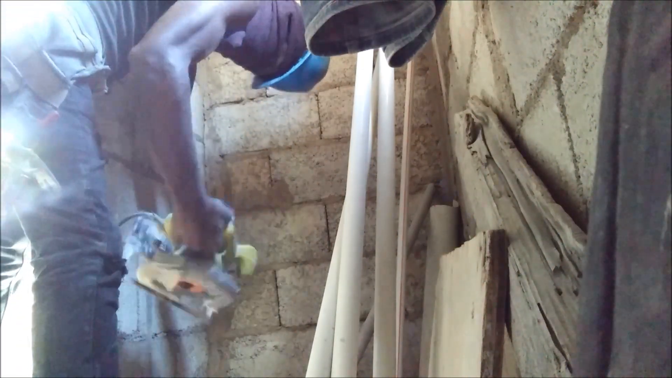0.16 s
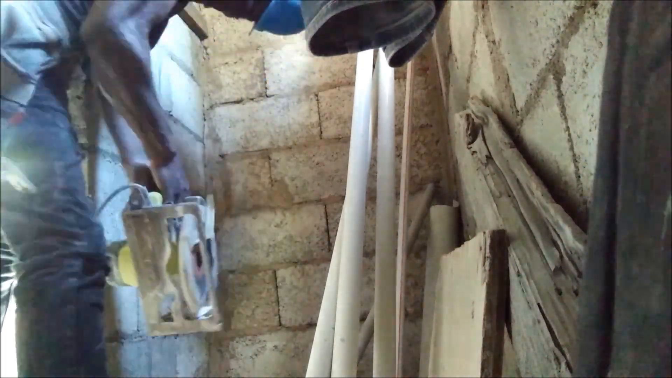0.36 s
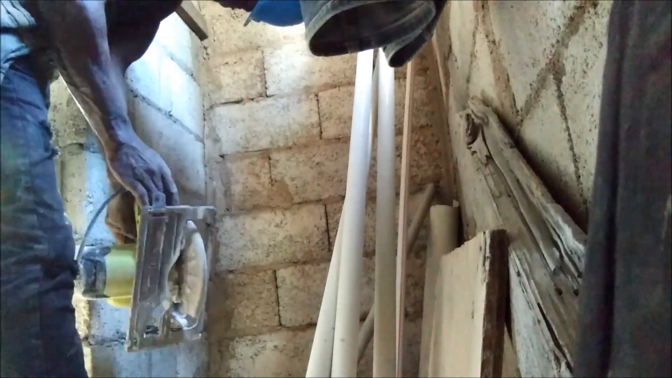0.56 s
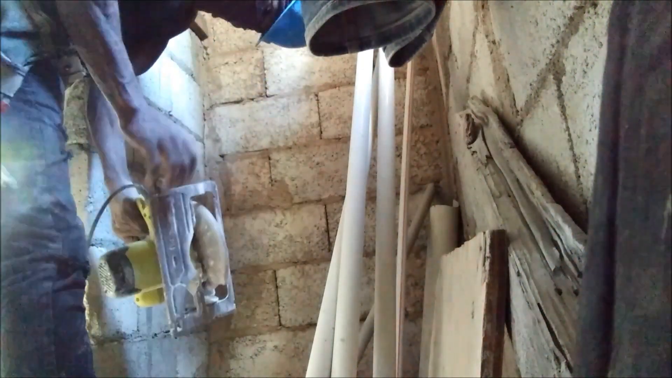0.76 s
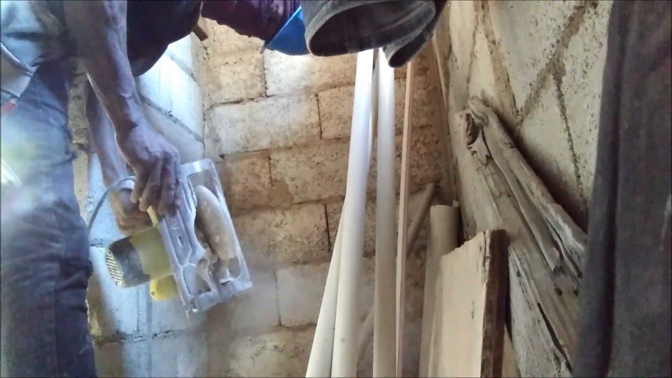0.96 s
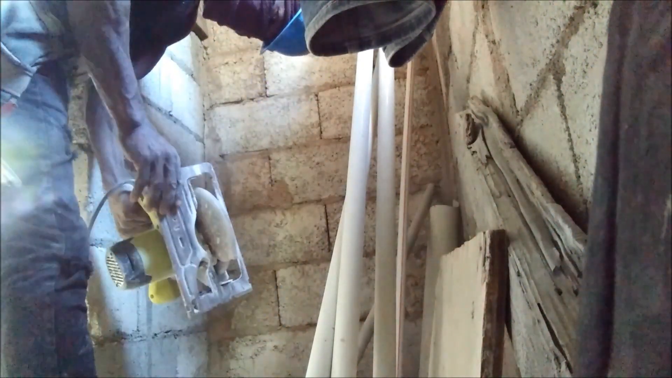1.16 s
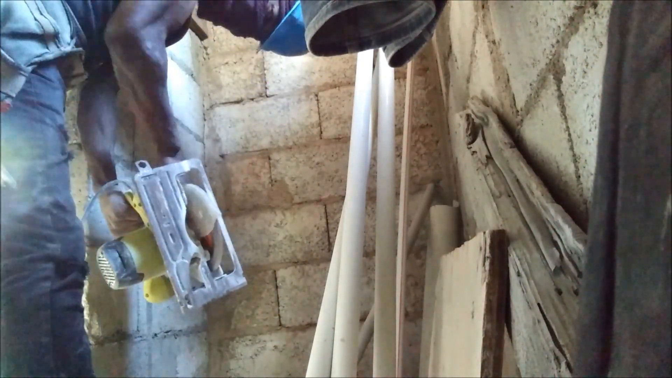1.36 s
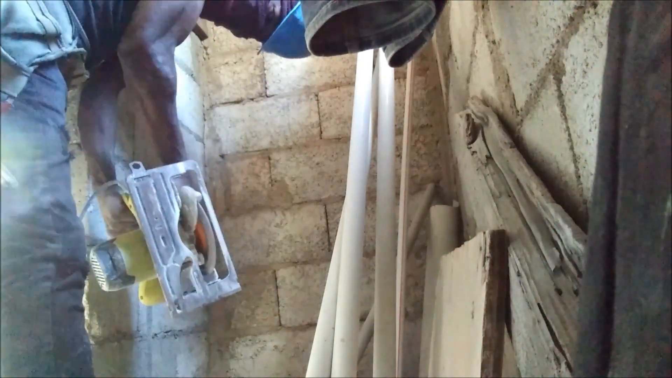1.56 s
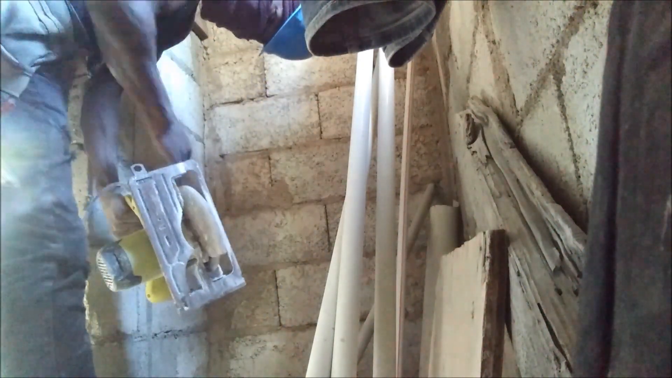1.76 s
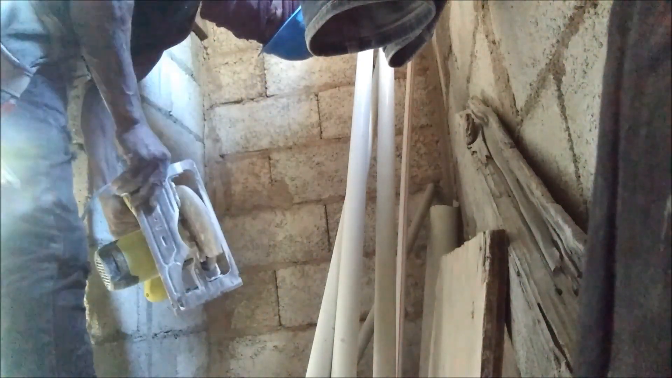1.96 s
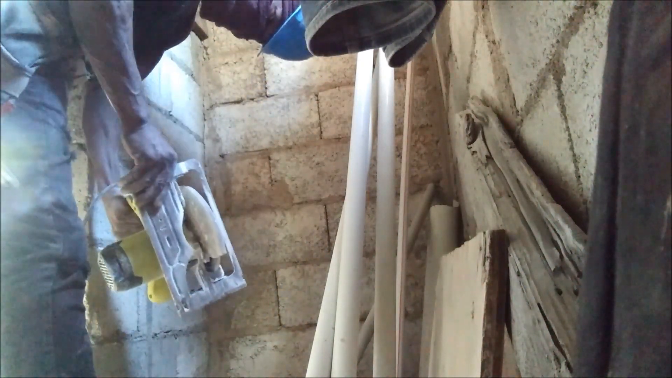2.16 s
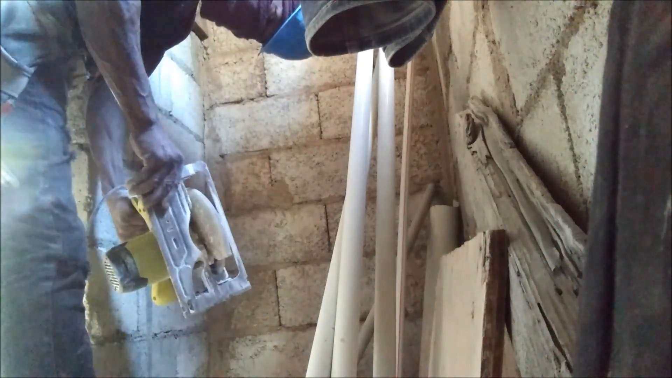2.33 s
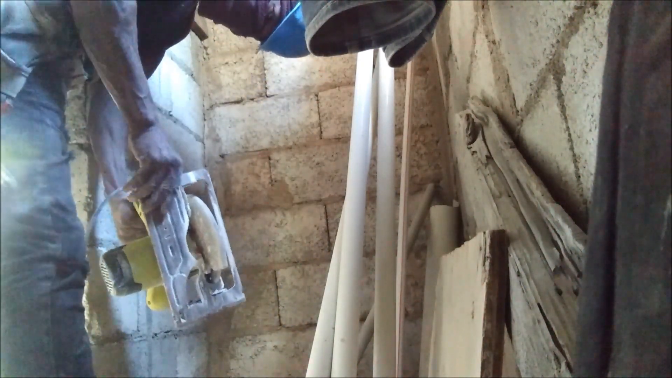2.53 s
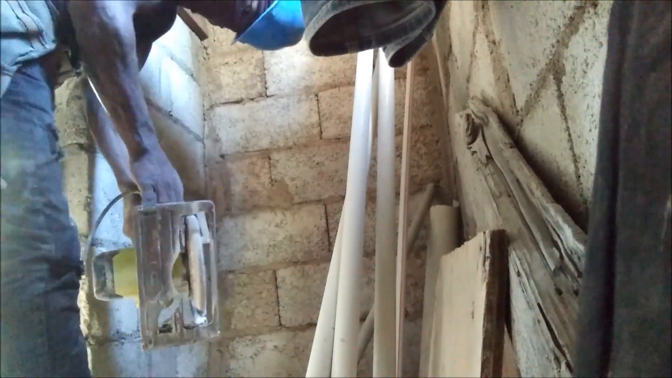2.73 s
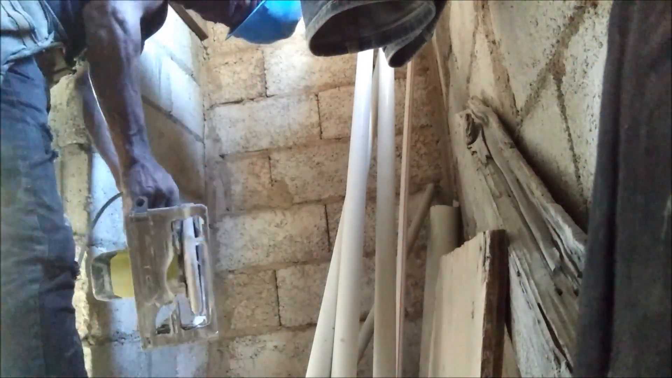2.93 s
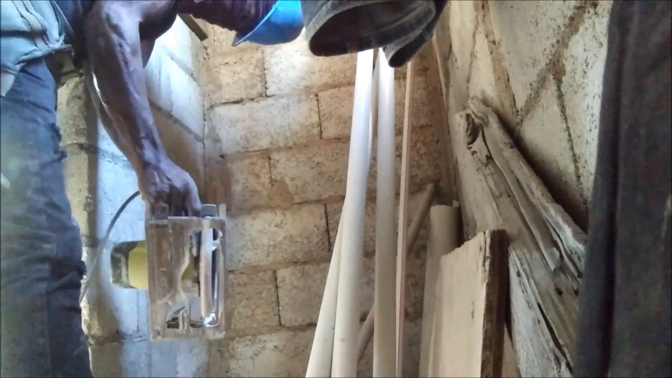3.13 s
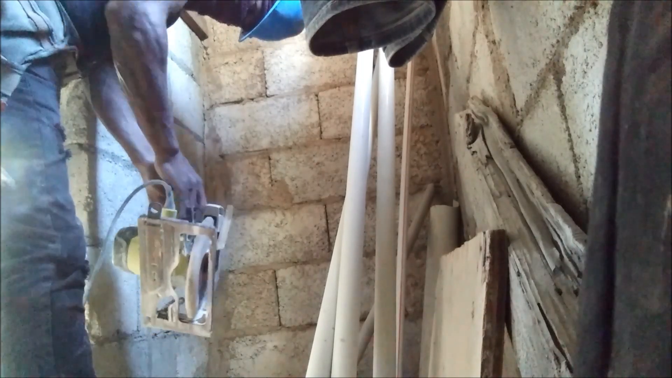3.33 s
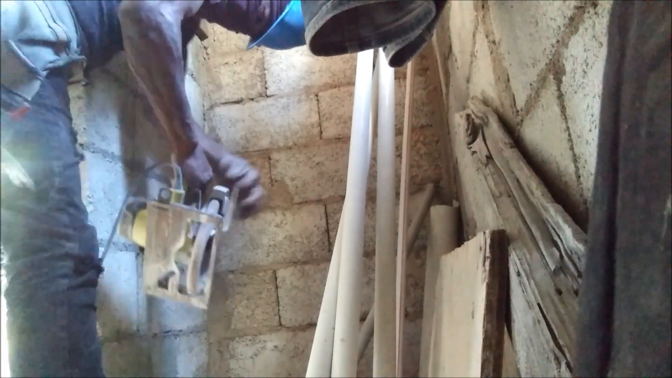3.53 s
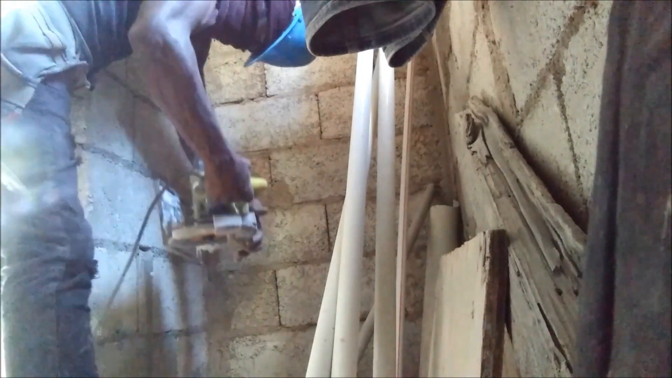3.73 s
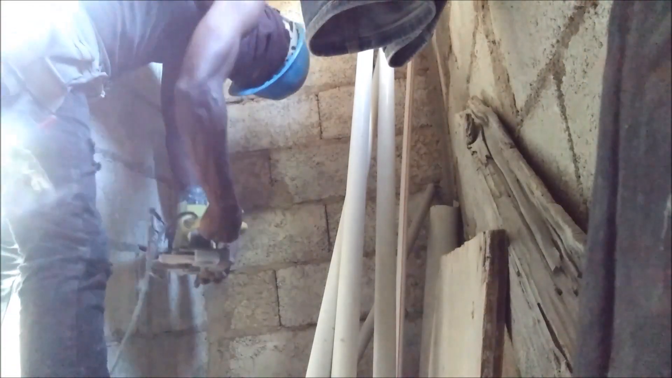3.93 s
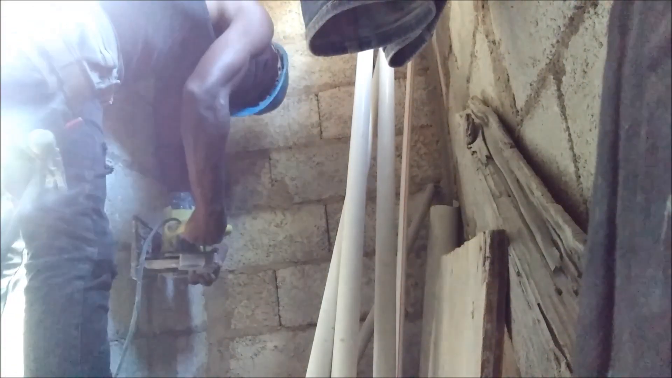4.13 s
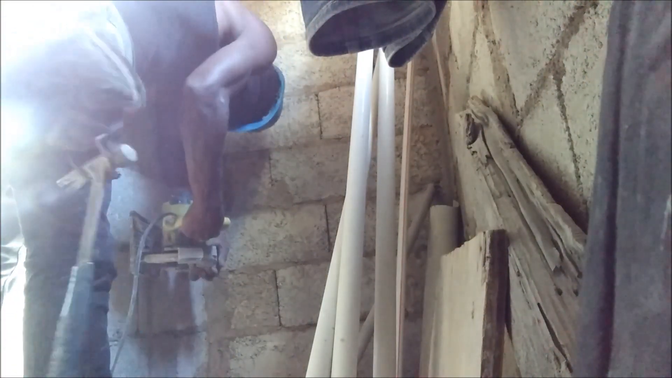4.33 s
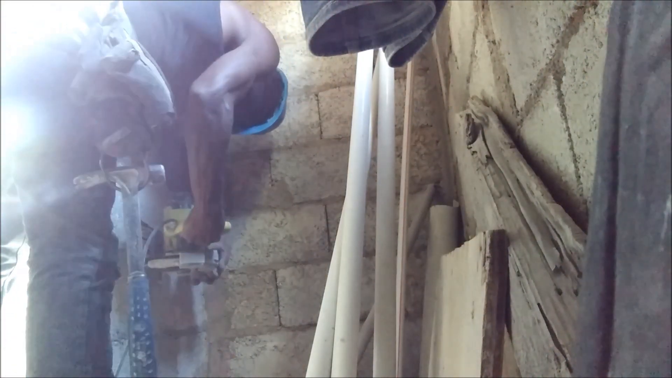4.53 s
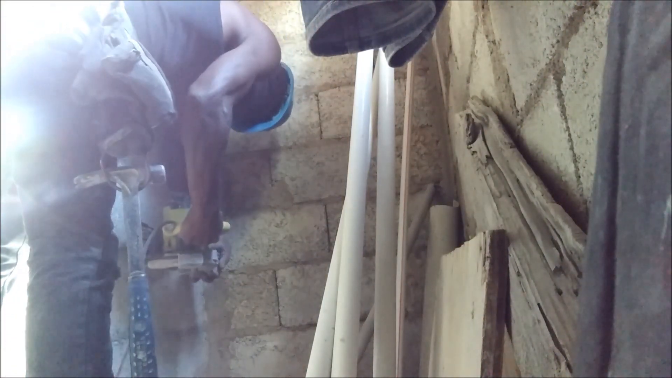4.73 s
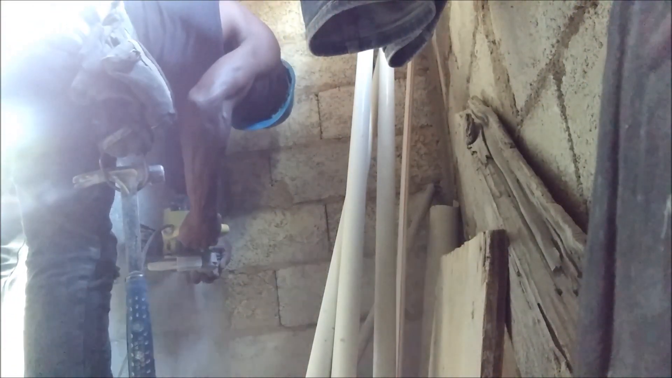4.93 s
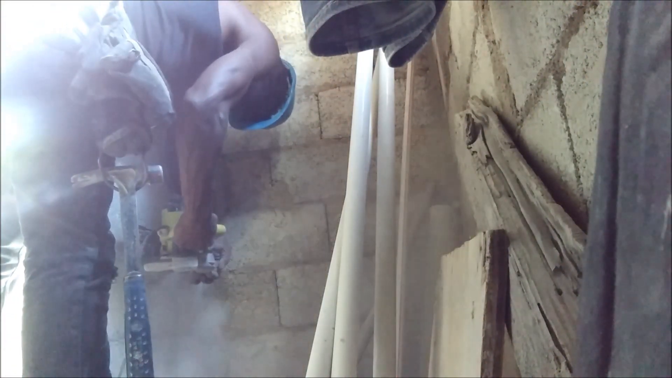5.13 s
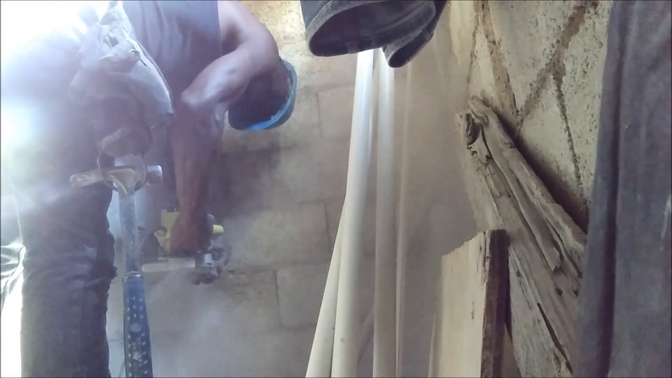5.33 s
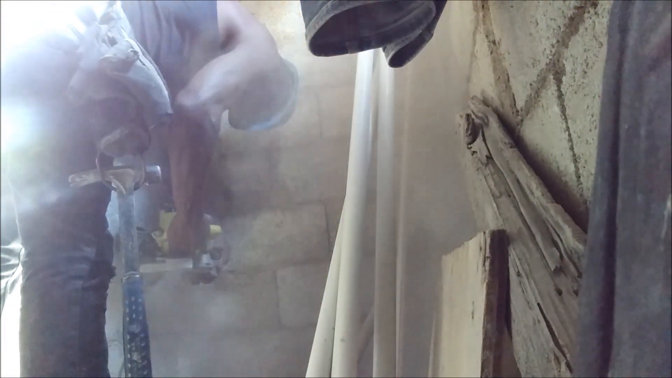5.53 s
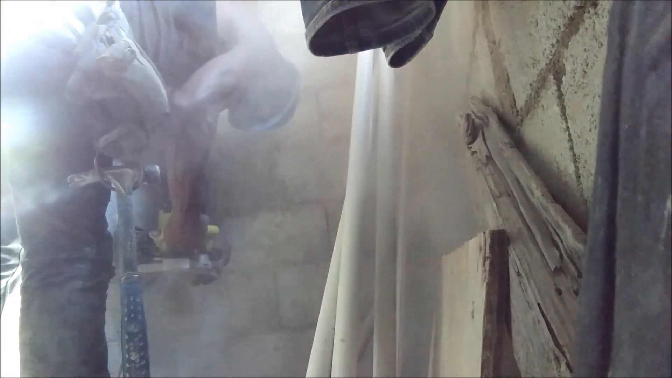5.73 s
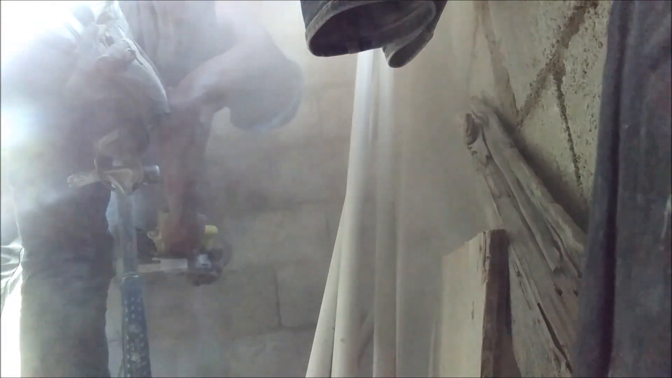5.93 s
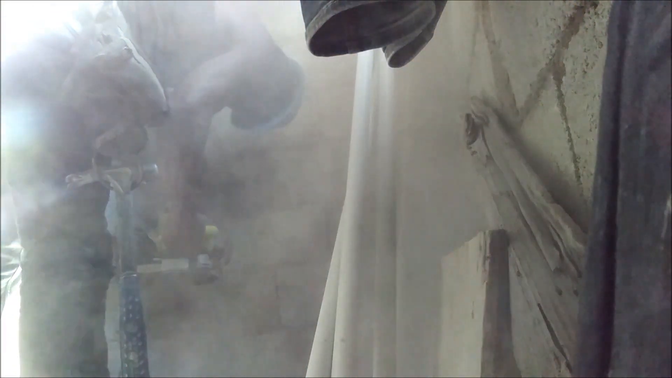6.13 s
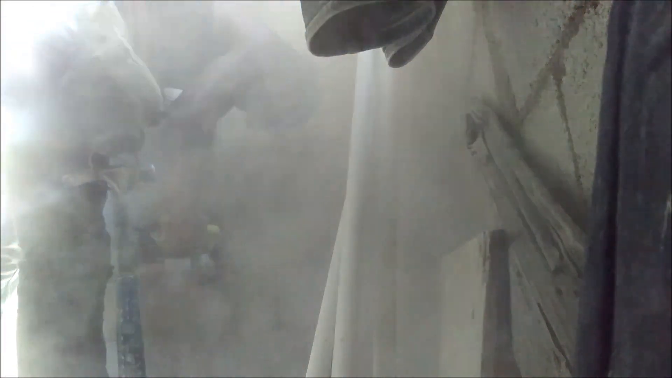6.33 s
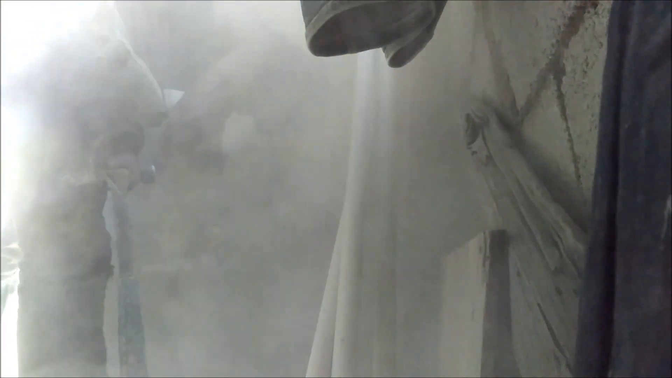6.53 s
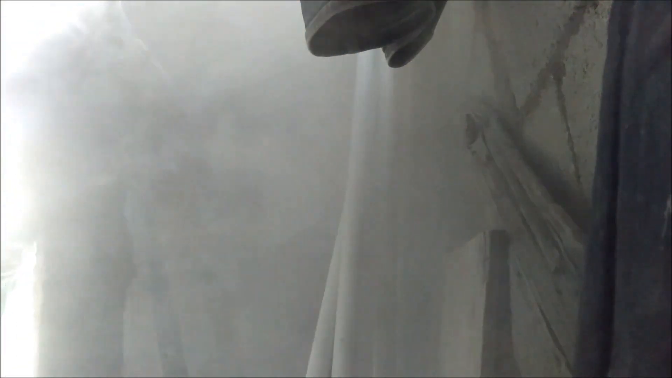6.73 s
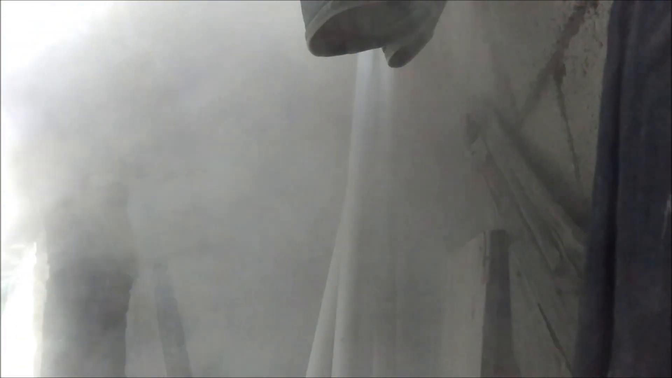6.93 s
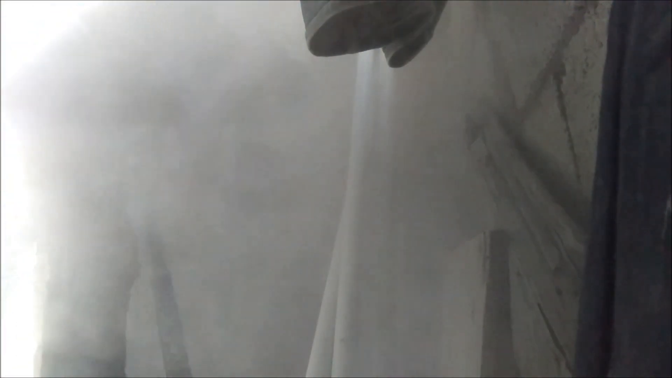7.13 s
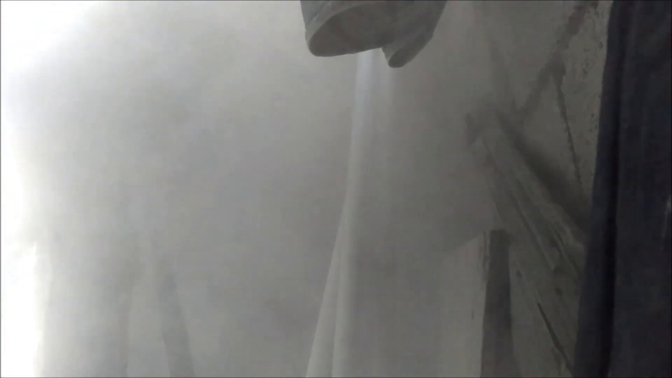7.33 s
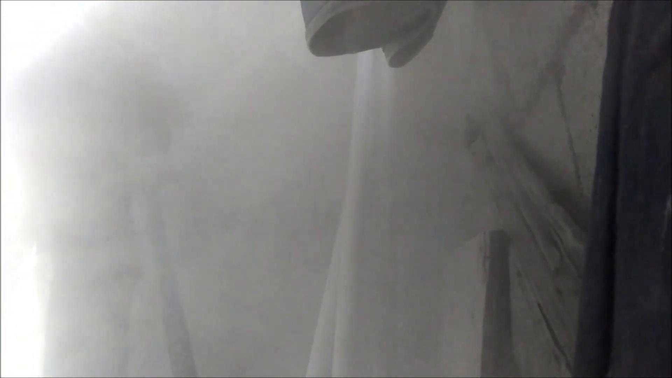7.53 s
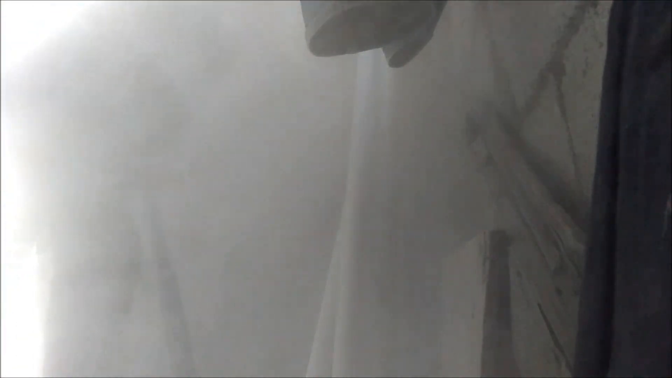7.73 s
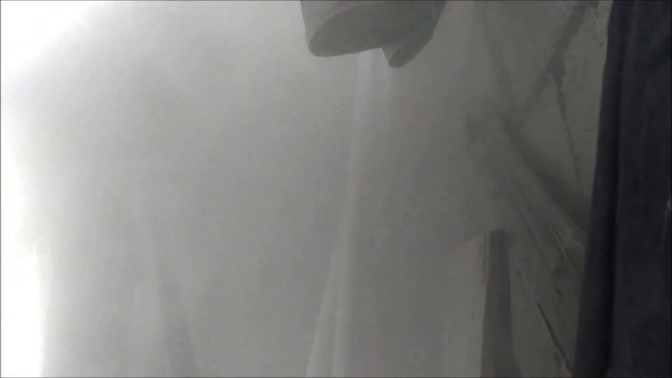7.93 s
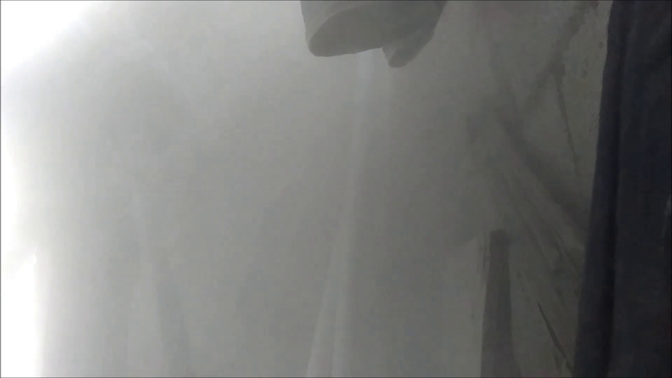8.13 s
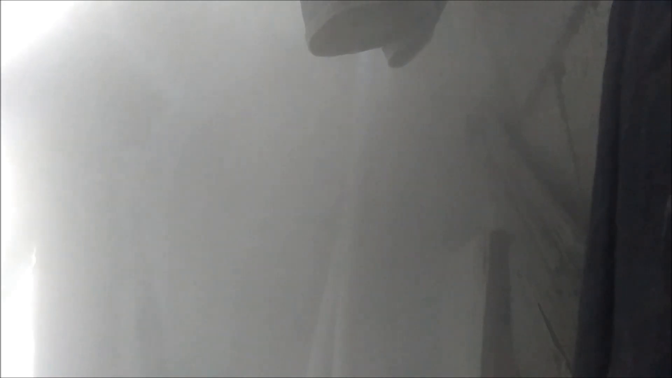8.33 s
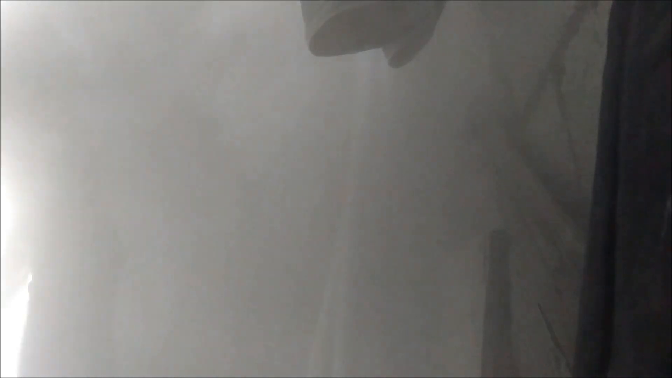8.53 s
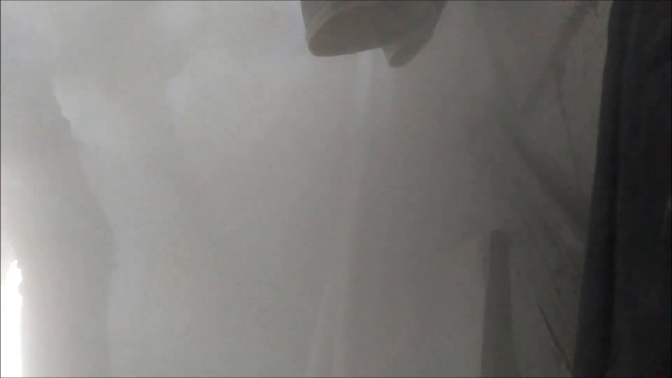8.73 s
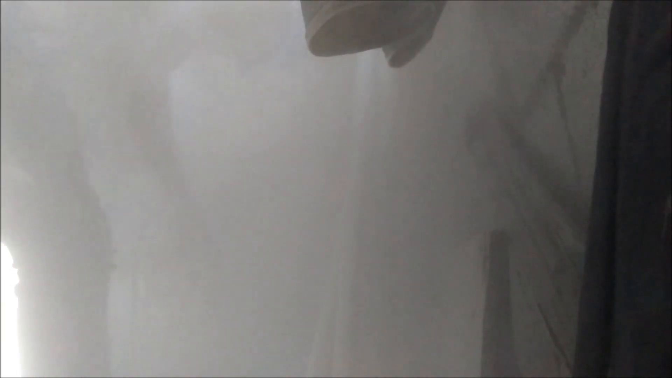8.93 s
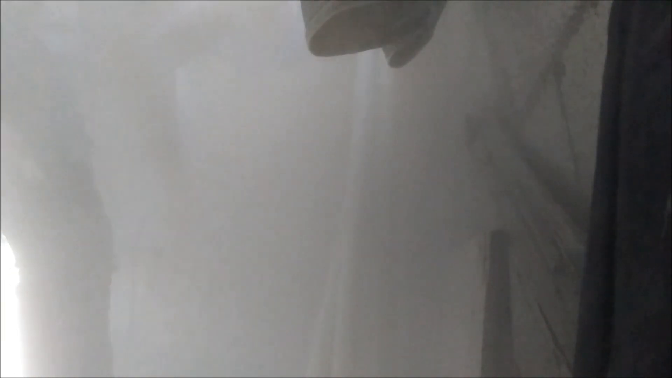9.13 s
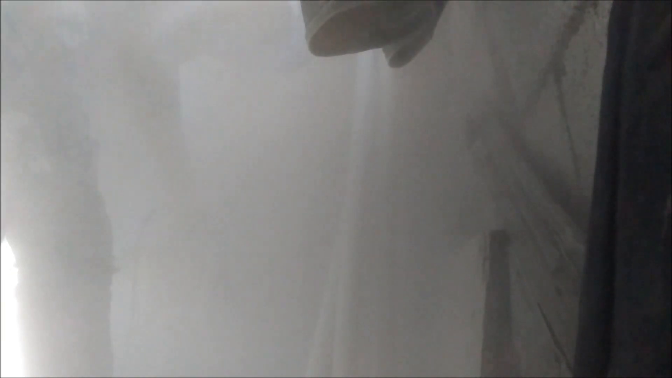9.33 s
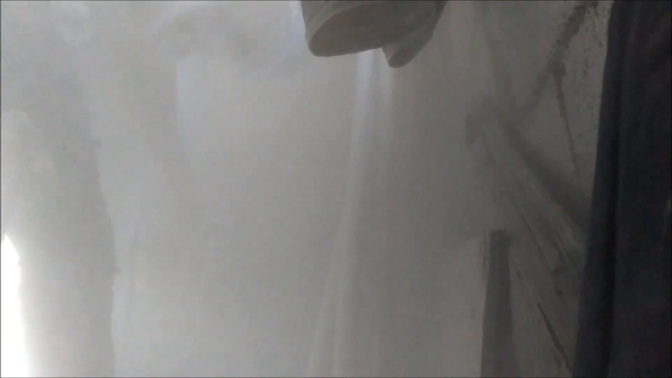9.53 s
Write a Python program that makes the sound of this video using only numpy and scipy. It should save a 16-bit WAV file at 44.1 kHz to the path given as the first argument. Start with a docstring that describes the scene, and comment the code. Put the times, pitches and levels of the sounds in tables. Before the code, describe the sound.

Close in a small block-walled room, an angle grinder clunks and scrapes in the hand. A trigger crack and a very short burst set its gears chattering, their pitch falling to a stop. After a quieter pause with a faint low wavering drone and sharp knocks, it starts again and cuts the wall for about four seconds, harsh, gritty and ringing, then winds down.

```python
"""Disc grinder in a block-walled room

A hand-held grinder close to one microphone: a trigger blip, a short burst that winds down, then a long cut.
Gears whine under power and chatter as they coast; noise through resonances makes grit and ringing disc.
The tool knocks and scrapes as it is handled, and a low drone of tone and blurred noise wavers underneath."""
import sys
import numpy as np
from scipy import signal
from scipy.fft import rfft, irfft, next_fast_len
from scipy.io import wavfile
from scipy.ndimage import uniform_filter1d, map_coordinates

SR = 44100
rng = np.random.default_rng(int(sys.argv[2]) if len(sys.argv) > 2 else 0)


def dump_mix(stems):
    """Bounce the given channels to the path in sys.argv[1] as a 16-bit WAV at rate SR."""
    frames = np.atleast_2d(stems).T  # one column per channel
    limited = np.clip(frames, -1, 1)  # hard clip at full scale
    pcm = np.round(limited * 32767).astype(np.int16)
    wavfile.write(sys.argv[1], SR, pcm)


N = 422037
T = np.arange(N) / SR
TOP_HZ = 16000  # upper band limit
CUT_START, CUT_END = 4.449, 8.37  # disc in the wall, s
TEETH = 36  # on the gear wheel

# motor runs: on t/s, off t/s, standstill t/s, friction braking/Hz per s,
# tooth rate at which air drag equals friction f/Hz, gearbox level/dB, chatter level/dB, fan level/dB
RUNS = [(.985, 1.02, 2.575, 2822, 4043, -38, -13, -33.5),
        (4.447, 8.37, 10.194, 1921, 2953, -31, -13, -28.5)]
# resonances of the tool housing: f/Hz, width/Hz, level/dB
HOUSING = [(1550, 44, -7.5), (2080, 154, -3), (3780, 240, 1), (5520, 245, 6.5), (6115, 410, 5),
           (7640, 970, -3.5), (9500, 1400, -3.5), (10640, 510, 2.5), (11980, 700, 1), (13450, 680, 0.5),
           (15100, 1400, -2)]
# spectrum of the gearbox rumble: f/Hz, density/dB
GEARBOX = [(30, -37), (300, -10.5), (800, -24.5), (1150, -6.5), (1550, 4), (1800, -5), (2130, 8),
           (2700, -2.5), (3250, 4), (3800, -3), (4500, -5.5), (6000, -18)]
# spectrum of the bright gear rattle: f/Hz, density/dB
CHATTER = [(3000, -50), (4900, -4.5), (5600, 2.5), (6400, 1.5), (7000, -1.5), (7700, 1.5), (8700, -6),
           (11000, -1.5), (13500, -3), (16000, 3)]


def amp(db):
    """Decibels to gain."""
    return 10 ** (np.asarray(db) / 20)


def unit(x):
    """Scale to rms 1."""
    return x / np.sqrt(np.mean(x ** 2) + 1e-20)


def along(points, hz):
    """Read (Hz, value) points on a log frequency axis."""
    f, v = np.transpose(points)
    return np.interp(np.log(hz + 1), np.log(f + 1), v)


def curves(rows):
    """One value per sample for each column after the time."""
    s, *cols = np.transpose(rows)
    return [np.interp(T, s, c) for c in cols]


def since(start):
    """Seconds since a moment, 0 before it."""
    return np.maximum(T - start, 0)


def gate(on, off, rise=0.00082, fall=0.016):
    """Open in a straight rise (s), then die away after off with time constant fall (s)."""
    return np.clip((T - on) / rise, 0, 1) * np.exp(-since(off) / fall)


def arch(start, length):
    """A swell from silence to 1 and back."""
    return np.abs(np.sin(np.pi * np.clip((T - start) / length, 0, 1))) ** 0.6


def glide(start, length, from_hz, to_hz):
    """A straight change of pitch."""
    return np.interp(T, [start, start + length], [from_hz, to_hz])


def near(hz, centre_hz, width_hz):
    """1 on a resonance, falling towards 0 away from it."""
    return 1 / (1 + ((hz - centre_hz) / width_hz) ** 2)


def wobble(rate):
    """A smooth random curve, rate knots a second."""
    return map_coordinates(rng.standard_normal(int(N * rate / SR) + 4), [T * rate])


def turn(hz):
    """Running phase of a changing frequency."""
    return 2 * np.pi * np.cumsum(hz) / SR


def filtered(x, response):
    """x times a response of frequency, padded so that tails do not wrap round."""
    m = next_fast_len(N + SR // 2)
    return irfft(rfft(x, m) * response(np.fft.rfftfreq(m, 1 / SR)), m)[:N]


def noise(spectrum):
    """Coloured noise of rms 1."""
    return unit(filtered(rng.standard_normal(N), lambda hz: amp(along(spectrum, hz))))


def ring(x, modes):
    """x through a set of resonances with alternating sign."""
    def response(f):
        total = 0
        for k, (centre, width, db) in enumerate(modes):
            damping = 1j * f * width
            total = total + (-1) ** k * amp(db) * damping / (centre * centre - f * f + damping)
        return total
    return filtered(x, response)


def rung_noise(modes):
    """White noise through a set of resonances."""
    return ring(rng.standard_normal(N), modes)


def patchy(x, depth_db):
    """Colour that shifts at random from moment to moment, at rms 1."""
    z = signal.stft(x, nperseg=512)[2]
    field = uniform_filter1d(rng.standard_normal(z.shape), size=9, axis=0)
    field = uniform_filter1d(field, size=10, axis=1)
    return unit(signal.istft(z * amp(depth_db * unit(field)), nperseg=512)[1][:N])


def air():
    """Steady coloured noise is the quiet floor of the room."""
    # floor spectrum: f/Hz, density/dB
    floor = [(25, -23), (90, -13), (200, -22), (600, 7), (900, -18.5), (2000, -21.5), (5000, -31.5),
             (10000, -33.5), (16000, -34.5)]
    return amp(-59.5) * noise(floor)


def drone():
    """A low tone swells again and again out of a blur; a fast flutter gives it faint side tones."""
    # swells: start t/s, length/s, start f/Hz, end f/Hz, level/dB, pure-tone share of power/0-1,
    # overtone level re fundamental/dB
    swells = [(-.08, .3, 236.4, 236, -49, 0.3, -25), (0.383, 0.21, 217.7, 251, -38.5, 0.48, -15),
              (.58, .4, 235, 216, -49.5, .2, -25), (1.826, 0.24, 232, 253.7, -43.5, 0.74, -25),
              (2.127, 0.27, 231, 216, -43, 0.6, -25), (2.5, 0.092, 225, 210, -43.5, 0.05, -25),
              (2.787, 0.17, 208.5, 244.4, -42.5, 0.73, -25), (2.948, 0.24, 245, 277, -36.5, 0.97, -23),
              (3.499, 0.49, 309.4, 299, -36.5, 0.86, -23), (4.05, .21, 273, 268, -46.5, 0.85, -17.5),
              (4.243, 0.14, 266, 265, -26.5, .98, -21), (4.46, 0.52, 277.4, 252, -44.5, 0.93, -20),
              (7.725, 0.53, 215, 265, -43, 0.9, -17), (8.267, 0.13, 262, 266.6, -28, .95, -11),
              (8.378, 0.24, 269.4, 276.3, -23.5, .95, -12), (8.564, .28, 274.5, 282, -31, 0.9, -9.5),
              (8.844, .45, 282.7, 287, -37, 0.41, -2.5), (9.209, 0.36, 290, 293.4, -34.5, 0.73, -9.5)]
    blur = noise([(100, -46.0), (160, -16.5), (210, -0.5), (270, -4.0), (330, -7), (400, -23.5), (600, -65.5)])
    waver_hz = 3 * wobble(40) + 2.5 * wobble(9)
    hum = amp(-53.5) * blur  # the bed that stays between swells
    for s, length, from_hz, to_hz, db, pure, overtone_db in swells:
        phase = turn(glide(s, length, from_hz, to_hz) + waver_hz)
        pure = np.clip(pure, 0, 1)
        tone = np.sqrt(2) * (np.sin(phase) + amp(overtone_db) * np.sin(2 * phase))
        hum = hum + amp(db) * arch(s, length) * (np.sqrt(pure) * tone + np.sqrt(1 - pure) * blur)
    flutter = turn(np.full(N, 400.0))  # Hz
    sides = 1 + 0.3 * (np.cos(flutter) + 0.11 * np.cos(2 * flutter) + 0.0297 * np.cos(3 * flutter))
    return hum * sides * amp(1.8 * wobble(22))


def ticks(count):
    """Faint random knocks of loose parts as the tool is turned over: (s, level dB, brightness dB)."""
    return [(3.4 + 0.55 * u, -49.5 + 6 * v, 1.5) for u, v in rng.random((count, 2))]


def knocks():
    """The housing clatters in the hand: quick two-stage decays excite dull and bright parts of its shell."""
    # knocks: t/s, level before the dull and bright trims/dB, brightness/dB
    blows = [(0.3727, -28.5, -17), (0.439, -24.5, -26), (0.4721, -33, -7), (0.4973, -27, -9),
             (0.513, -30, -12), (0.593, -27, -20), (0.8589, -29, -12), (0.8835, -22.5, -17),
             (2.677, -54, 6), (3.3046, -51.5, -5), (3.402, -36.5, 1), (3.53, -48.5, 2.5), (3.577, -51, 2),
             (3.629, -22, -5), (3.675, -43, 13), (3.704, -18.5, -5), (3.7728, -48, 1), (3.8746, -43, -2),
             (4.103, -26.5, -16), (4.2887, -21.5, -14), (4.3276, -9.5, -13), (1.353, -2.5, -22),
             (8.52, -4.5, -7)]
    dull, bright = np.zeros(N), np.zeros(N)
    t = np.arange(SR // 5) / SR
    decay = amp(-60 * t / 0.048) + 0.21 * amp(-60 * t / 0.14)  # t60 in s
    shape = decay * (1 - np.exp(-t / 0.0015))
    for s, db, bright_db in blows + ticks(count=4):
        blow = amp(db) * shape
        dull[round(s * SR):][:len(t)] += blow
        bright[round(s * SR):][:len(t)] += blow * amp(bright_db)
    # the low and high parts of the shell vary from contact to contact
    shell = unit(rung_noise(HOUSING[:5]))
    colour = amp(5.3 * wobble(8.8)) * shell + amp(2.3 * wobble(15)) * noise(GEARBOX)
    low = amp(-11) * dull * patchy(colour, depth_db=4.0)
    high = amp(1.0) * bright * patchy(noise(CHATTER), depth_db=2.5)
    return (low + high) * amp(1.6 * wobble(220))


def slides():
    """The base plate slides over the blocks: uneven swells of coloured noise."""
    # slides: start t/s, length/s, level/dB
    strokes = [(-.12, .38, -45), (0.274, 0.4, -53), (0.623, 0.4, -49.5), (3.6, 0.23, -53.5),
               (3.838, 0.58, -49.5), (4.248, 0.36, -38.5)]
    # spectrum of the scraped plate: f/Hz, density/dB
    plate = [(470, -37.5), (800, 2), (930, -8.5), (1550, -0.5), (2530, -7.5), (4240, 2.5), (6000, -1),
             (8230, -13.5), (9450, -12.5), (15400, -56)]
    level = sum(amp(db) * arch(s, length) for s, length, db in strokes)
    return level * amp(1.8 * wobble(60) + 1.5 * wobble(500)) * patchy(noise(plate), depth_db=2.5)


def last_ring():
    """The disc rings on as it stops after the short burst: wavering, decaying tones."""
    # ringing tones: f/Hz, level/dB, t60/s
    tones = [(2070, -42, 0.13), (5130, -53, 0.18), (5420, -50.5, 0.22)]
    after = since(2.535)
    ringing = sum(amp(db - 60 * after / t60) * np.sin(turn(hz + 70 * wobble(400))) for hz, db, t60 in tones)
    return (1 - np.exp(-after / 0.0034)) * ringing


def jolts():
    """At each pull of the trigger the inrush current slams the gears, sparks the brushes and rings the housing."""
    # trigger pulls: on t/s, end of inrush t/s, level/dB, housing hum re that level/dB
    pulls = [(0.733, 0.732, -8, -40), (0.985, 1.041, -9.5, -28), (4.447, 4.495, -9.5, -14)]
    # spectrum of the crack: f/Hz, density/dB
    jolt = [(24, -55), (40, -33), (646, -19), (790, -24.5), (942, -25.5), (1550, -5), (1850, -16),
            (2150, -2.5), (3220, -15), (3830, -1.5), (4680, -7), (5580, 6), (6330, 2), (7000, -6),
            (16000, -1.5)]
    hum_hz, hum_rise_s = 795, 0.02
    crack, hum = 0, 0
    for on, off, db, hum_db in pulls:
        crack = crack + amp(db) * gate(on, off, rise=0.0012, fall=0.007 + 0.25 * (off - on))
        hum = hum + amp(db + hum_db) * gate(on + hum_rise_s / 2, off, rise=hum_rise_s)
    mains = amp(0.39 * np.sin(2 * np.pi * 120 * T) + 0.67 * wobble(600))  # 120 Hz pulsing
    return crack * mains * noise(jolt) + hum * np.sin(turn(hum_hz + 12 * wobble(150)))


def tooth_rate():
    """The motor nears the speed its load allows; switched off, air drag and then friction brake it (Hz)."""
    # tooth rate under power, sagging as the disc is pressed into the wall: t/s, f/Hz
    loaded_speed = [(4.69, 10080), (4.8, 9776), (4.98, 8860), (5.38, 7700), (5.7, 7246), (6.01, 8800),
                    (6.12, 8200), (6.38, 7860), (6.6, 8200), (6.81, 9100), (6.92, 8270), (7.07, 8040),
                    (7.22, 9000), (7.3, 8260), (7.42, 8880), (7.57, 8700), (7.71, 9000), (7.88, 8500),
                    (8.1, 8870), (8.35, 9330)]
    hz, powered = np.zeros(N), curves(loaded_speed)[0]
    for on, off, still, friction, drag_hz, *_ in RUNS:
        driven = powered * (1 - np.exp(-since(on) / 0.045))  # spin-up time constant, s
        coasting = drag_hz * np.tan(friction / drag_hz * np.clip(still - T, 0, still - off))
        hz = np.where(T < on, hz, np.where(T < off, driven, coasting))
    return np.maximum(hz, 1)


def fan():
    """The cooling fan's rush falls steeply with speed as the motor runs down."""
    # spectrum of the rush: f/Hz, density/dB
    rush = [(25, -1), (200, -6.5), (500, -1), (900, -1), (1500, 6.5), (3000, -1), (8000, -14)]
    speed = tooth_rate() / 6000
    coasting = sum(gate(off, still, rise=0.059) * amp(db) for _, off, still, *_, db in RUNS)
    return coasting * np.minimum(speed, 1) ** 1.63 * noise(rush)


def backlash_bursts(mesh_hz):
    """Unloaded teeth bounce across their backlash: level bursts, mostly deeper as the wheel slows."""
    slack = np.interp(mesh_hz, [700, 2000, 2970, 4160], [0.96, 1.05, 0.77, 0.3])
    bounce_hz = np.interp(mesh_hz, [1800, 3000, 6000], [90, 82, 130])
    bounce = turn(bounce_hz * np.exp(0.12 * wobble(70)))
    depth_db = slack * (4.5 * np.sin(bounce) + 1.9 * wobble(130))
    bursts = amp(depth_db + 0.95 * wobble(900) + 1.43 * wobble(25))
    return bursts / np.sqrt(np.abs(uniform_filter1d(bursts ** 2, size=4000)) + 1e-9)  # even level


def blurred_teeth(mesh_hz):
    """Tooth harmonics with random pitch blur and the wheel's eccentric swing, ringing the housing."""
    # harmonics: multiple, level/dB
    orders = [(1, -5), (2, 1.0), (3, 2.5), (4, 2), (5, -3.5), (6, -11), (7, -8), (8, -2.5)]
    mesh = turn(mesh_hz)
    runout = 0.39 * np.sin(mesh / TEETH)  # phase swing once a turn, radians per order
    blur_hz = np.interp(mesh_hz, [1000, 4000], [230, 340])
    teeth = 0
    for k, db in orders:
        phase = k * mesh + turn(blur_hz * wobble(750)) + k * runout
        teeth = teeth + amp(db + 1.5 * wobble(9)) * (k * mesh_hz < TOP_HZ) * np.sin(phase)
    teeth = ring(teeth, HOUSING)
    return teeth / np.sqrt(np.abs(uniform_filter1d(teeth ** 2, size=9000)) + 1e-6)  # even level


def coasting_gears():
    """Chatter of bouncing teeth fades early as the wheel slows; the gearbox rumbles on and booms at resonance."""
    mesh_hz = tooth_rate()

    def fade(knee_hz):
        return 1 / np.sqrt(1 + (knee_hz / mesh_hz) ** 3.25)

    tonal = np.interp(mesh_hz, [700, 1500, 2500, 6000], [0.18, 0.45, 0.59, 0.6])  # share of power
    rattle = unit(noise(CHATTER) + 0.57 * unit(rung_noise(HOUSING)))
    chatter = np.sqrt(tonal) * blurred_teeth(mesh_hz) + np.sqrt(1 - tonal) * rattle
    chatter *= fade(1780) * amp(0.77 * wobble(11))
    gearbox = unit(0.8 * noise(GEARBOX) + unit(rung_noise([(2050, 69, -6), (3763, 130, -1)])))
    boom = near(mesh_hz, 3650, 520)  # the tooth rate falls through the gearbox resonance
    gearbox += boom * np.sin(turn(mesh_hz) + turn(90 * wobble(400)))
    gearbox *= fade(737) * amp(5 * boom + 2.0 * wobble(12))
    runs = 0
    for _, off, still, _, _, gearbox_db, chatter_db, _ in RUNS:
        runs = runs + gate(off, still, rise=0.035) * (amp(gearbox_db) * gearbox + amp(chatter_db) * chatter)
    return backlash_bursts(mesh_hz) * runs


def driven_gears():
    """Powered teeth mesh unsteadily, louder with speed; runout of the wheel sets sidebands one turn apart."""
    mesh_hz = tooth_rate()
    mesh = turn(mesh_hz * (1 + 0.003 * wobble(25)) + 28 * wobble(700))  # slow and fast jitter
    shaft = mesh / TEETH
    # sidebands that swell and fade on their own: shaft turns from the tooth rate, level/dB
    sidebands = [(-2, -11), (-1, -6), (0, 0), (1, -6), (2, -8), (3, -12)]
    tone = unit(sum(amp(db + 2.5 * wobble(9)) * np.sin(mesh + k * shaft) for k, db in sidebands))
    loud_hz = 9180  # tooth rate at which the gear head resonates
    speed_db = 2.6 * (mesh_hz - loud_hz) / 1000  # growth of 2.6 dB per kHz
    level_db = -23.5 + speed_db + 7.5 * near(mesh_hz, loud_hz, 130)
    whine = amp(level_db + 1.6 * wobble(250) + 2 * wobble(16)) * tone
    # extra whine while the motor accelerates: dB, time constant in s
    torque_db, torque_s = 9.5, 0.08
    return whine * sum(gate(on, off) * amp(torque_db * np.exp(-since(on) / torque_s)) for on, off, *_ in RUNS)


def singing():
    """Single modes of the disc swell and waver in the slot."""
    # songs: start t/s, length/s, start f/Hz, end f/Hz, level/dB
    songs = [(4.45, 1.3, 10850, 10900, -21.5), (7.1, 1.3, 11000, 11380, -21.5),
             (4.88, 0.46, 2200, 2200, -36), (7.7, .95, 2380, 2490, -32)]
    tones = 0
    for s, length, from_hz, to_hz, db in songs:
        hz = glide(s, length, from_hz, to_hz) * (1 + 0.01006 * wobble(500))
        tones = tones + amp(db) * arch(s, length) * np.sin(turn(hz))
    return tones * amp(2.0 * wobble(25)) * gate(CUT_START, CUT_END, rise=0.035)


def cutting():
    """Grit torn from the wall rushes and keeps the steel disc ringing, pulsing with each turn."""
    # resonances of the disc: f/Hz, width/Hz, level/dB
    disc_modes = [(1230, 20, -16), (1510, 130, -15.5), (2140, 150, -11), (2320, 110, -15),
                  (3200, 82, -17.5), (4240, 60, -4.5), (5580, 230, 1), (6900, 140, -0.5), (7700, 130, 5.5),
                  (8600, 25, 4), (8630, 390, 0), (9400, 40, 0), (9600, 160, -5), (11000, 49, -17),
                  (10750, 110, 4), (13200, 83, -1)]
    # spectra of grit, hiss and top treble: f/Hz, density/dB
    grit_spectrum = [(15, -41), (25, -4.5), (157, -8.5), (256, -5.5), (293, -9.5), (569, -3), (1130, -3),
                     (1480, 1), (1890, -3), (2150, 0), (3350, -0.5), (5000, 1.5), (6500, -3), (11000, -120)]
    hiss_spectrum = [(3500, -35), (5000, -18), (5600, 8), (6500, 3.5), (7300, -3.5), (8500, -13.5),
                     (10000, 0.5), (12000, 0), (14000, 2.5), (16000, -3.5)]
    squeal_spectrum = [(12500, -42), (14000, -9), (14800, 12), (15400, 14), (16000, -16.5)]
    # top treble before its trim: t/s, level/dB
    squeal_level = [(4.5, -14), (4.59, -19), (5.1, -17), (5.11, -24), (5.26, -12.5), (6.8, -20.5),
                    (7.01, -20), (7.09, -16.5), (7.7, -22.5), (8.36, -21)]
    shaft = turn(tooth_rate() / TEETH)
    bite = amp(0.21 * np.sin(shaft) + 0.6 * wobble(45) + 0.57 * wobble(700) + 0.9 * wobble(7))
    entry_db = 3.5 * np.exp(-since(CUT_START) / 0.57)  # extra grit as the disc breaks the surface
    grit = amp(-27.5 + entry_db + 1.7 * wobble(1500)) * noise(grit_spectrum)
    hiss = amp(-19) * noise(hiss_spectrum)
    # the contact point wanders, so different modes of the disc take the lead
    modes = 0
    for first in range(3):
        lead = amp(2.5 * wobble(2.988) + 1.4 * wobble(14))
        modes = modes + lead * rung_noise(disc_modes[first::3])
    disc = amp(-20.5 + 0.23 * entry_db) * unit(modes)
    squeal = amp(curves(squeal_level)[0] - 1.5 + 1.2 * wobble(20)) * noise(squeal_spectrum)
    return bite * (grit + hiss + disc + squeal) * gate(CUT_START, CUT_END, rise=0.079, fall=0.034)


def room(x, wet_db):
    """Close block walls answer 3 ms later with a short noise tail whose decay depends on frequency."""
    # reverberation: f/Hz, t60/s
    decay = [(200, 0.29), (2000, 0.17), (6000, 0.075), (15000, 0.23)]
    hz, t, z = signal.stft(rng.standard_normal(SR // 3), SR, nperseg=256)
    tail = signal.istft(z * amp(-60 * t / along(decay, hz)[:, None]), SR, nperseg=256)[1]
    echo = signal.fftconvolve(np.pad(x, (130, 0)), tail / np.linalg.norm(tail))[:N]
    return (x + amp(wet_db) * echo) / np.sqrt(1 + amp(wet_db) ** 2)


def scene():
    """Everything reaches one microphone, alike in both channels."""
    handling = room(knocks() + slides() + last_ring(), wet_db=-9.0)
    start = room(jolts(), wet_db=-12.5)
    rundown = room(coasting_gears() + fan(), wet_db=-8.5)
    cut = room(cutting() + singing() + driven_gears(), wet_db=-6)
    mono = air() + drone() + handling + start + rundown + cut
    return np.array([mono, mono])


def record(dry):
    """The highest peaks are rounded off; the deepest bass and everything above the band limit are lost."""
    rounded = dry / (1 + np.abs(dry / 0.85) ** 6) ** (1 / 6)

    def band(hz):
        return hz / np.hypot(hz, 38) * np.clip((TOP_HZ - hz) / 200, 0, 1)

    return np.array([filtered(x, band) for x in rounded])


dry = scene()
out = record(dry)
dump_mix(out)
```